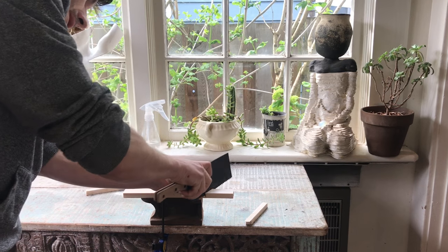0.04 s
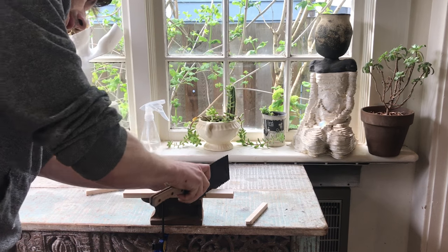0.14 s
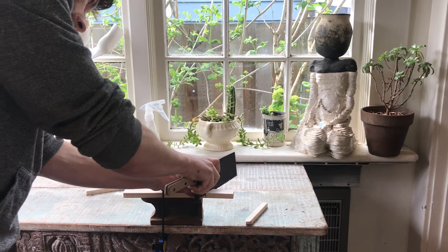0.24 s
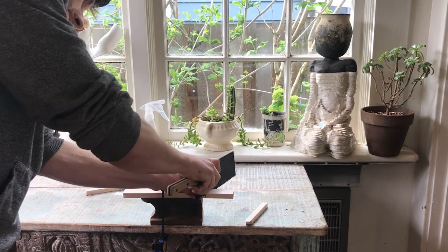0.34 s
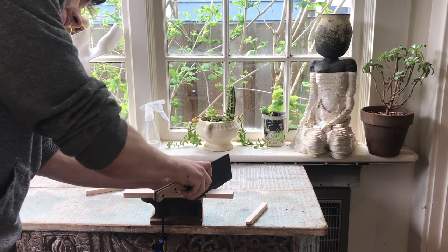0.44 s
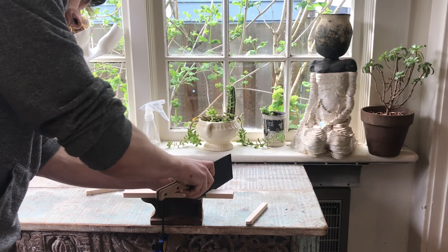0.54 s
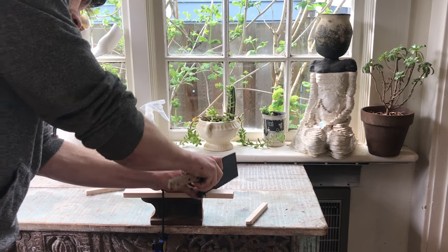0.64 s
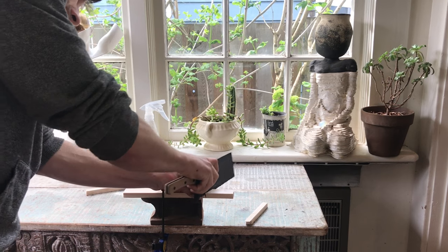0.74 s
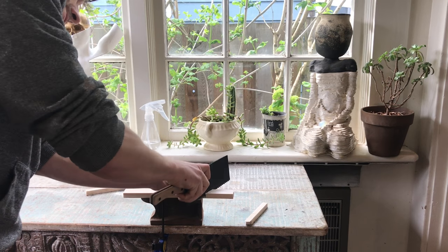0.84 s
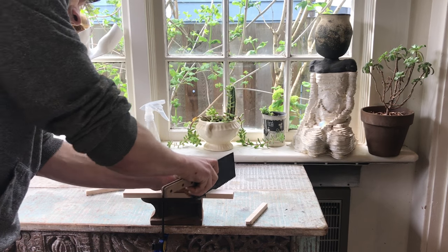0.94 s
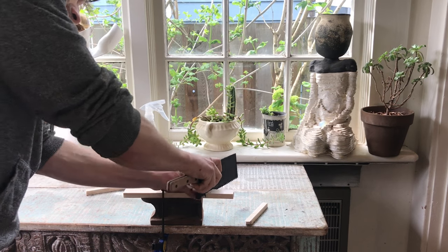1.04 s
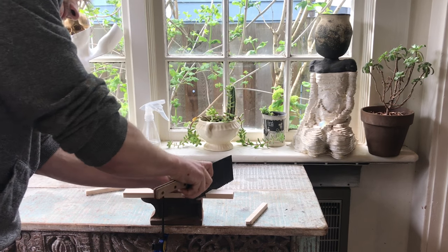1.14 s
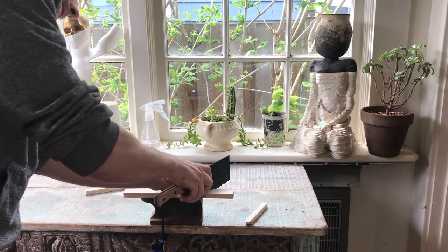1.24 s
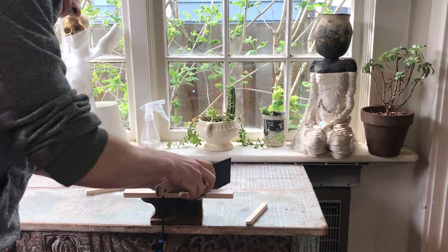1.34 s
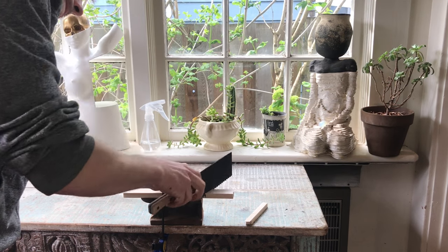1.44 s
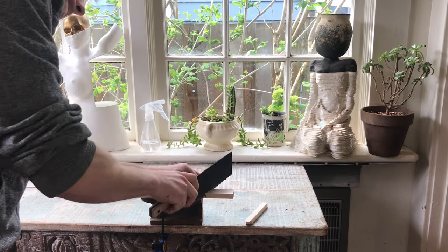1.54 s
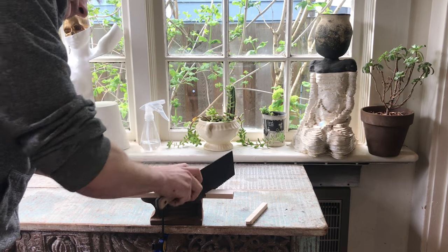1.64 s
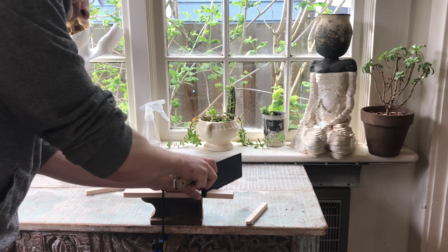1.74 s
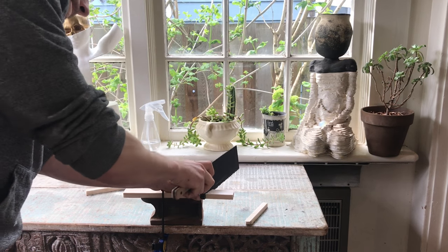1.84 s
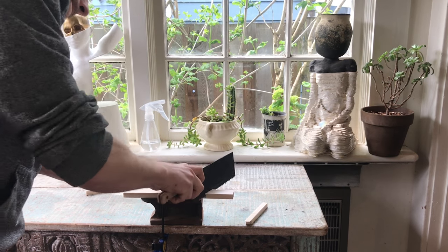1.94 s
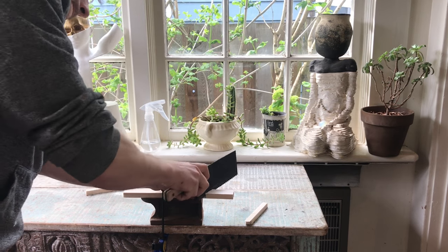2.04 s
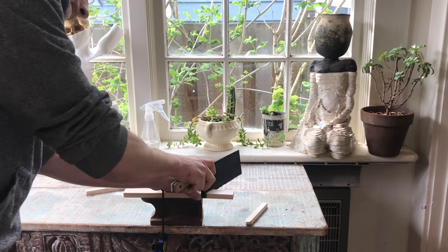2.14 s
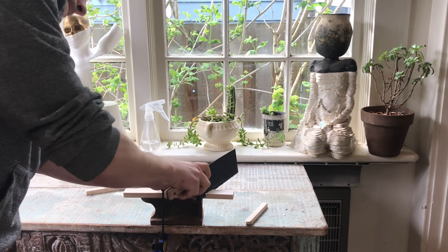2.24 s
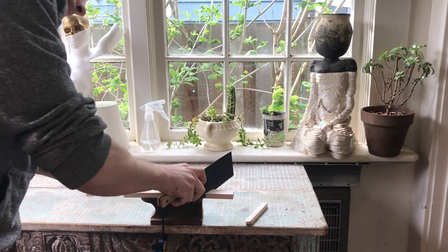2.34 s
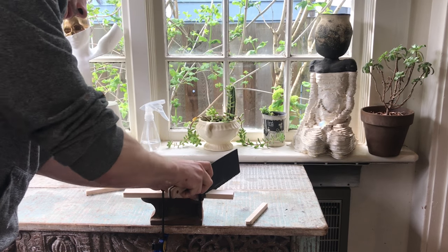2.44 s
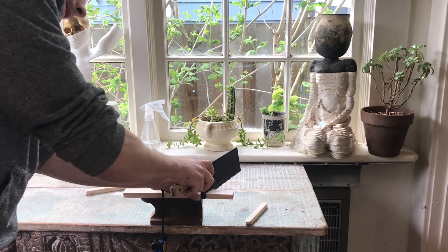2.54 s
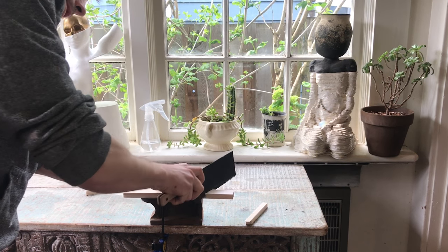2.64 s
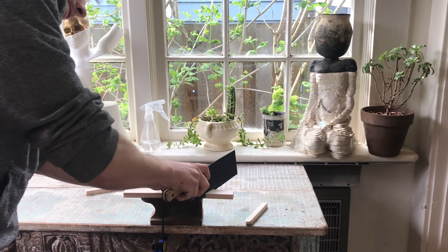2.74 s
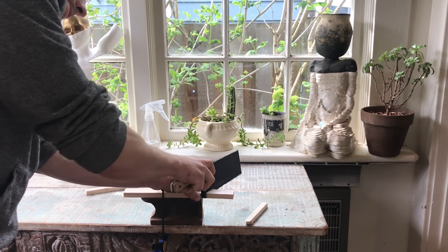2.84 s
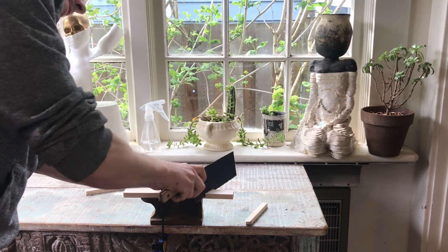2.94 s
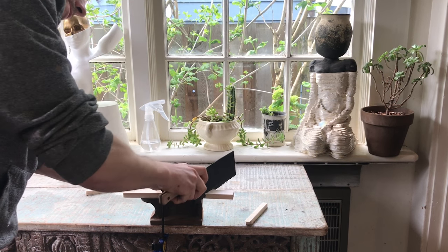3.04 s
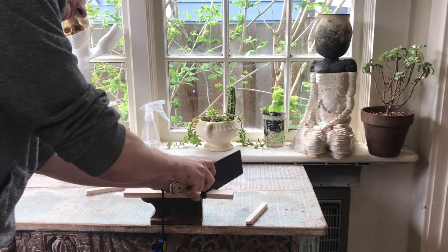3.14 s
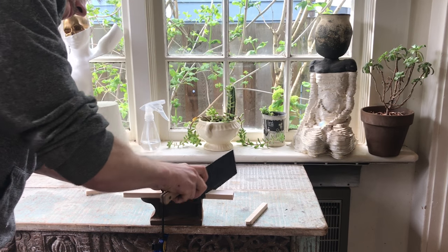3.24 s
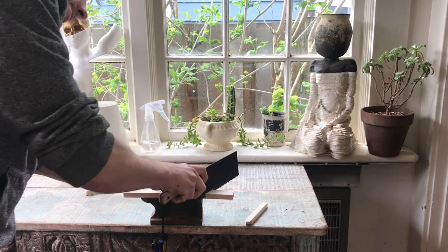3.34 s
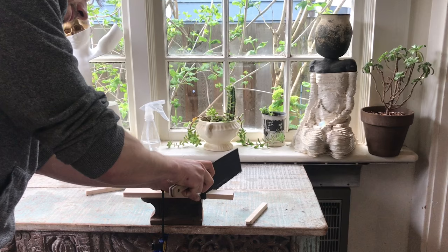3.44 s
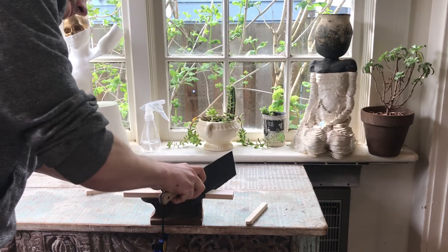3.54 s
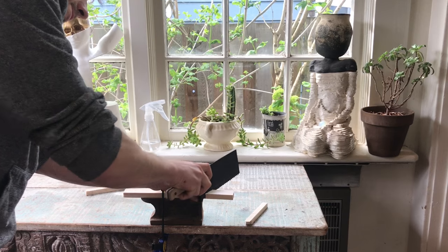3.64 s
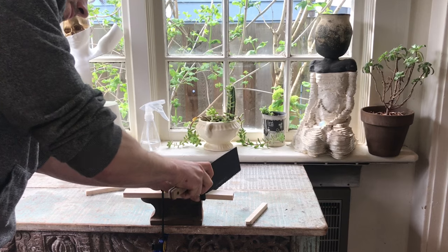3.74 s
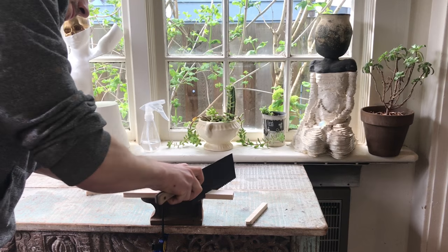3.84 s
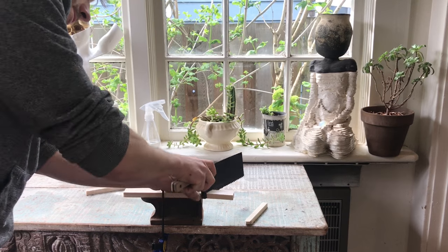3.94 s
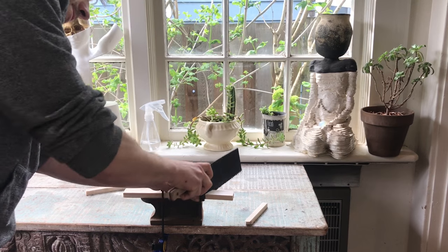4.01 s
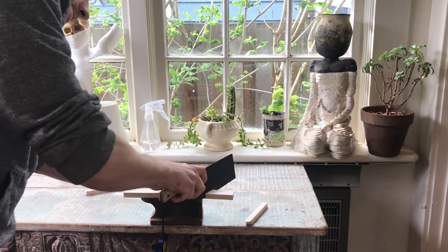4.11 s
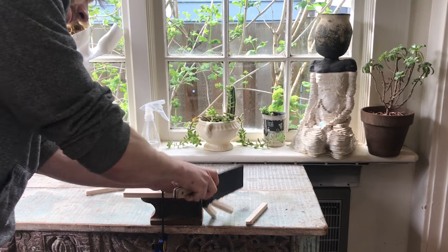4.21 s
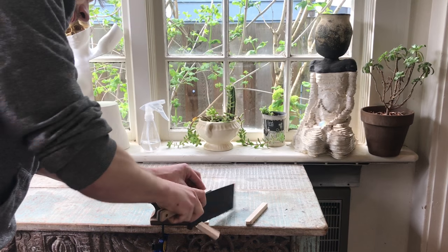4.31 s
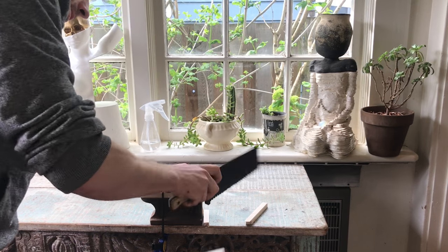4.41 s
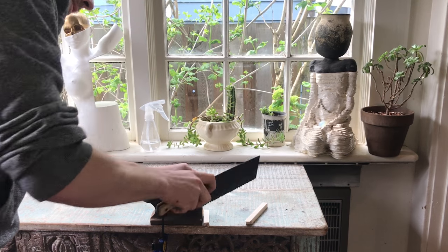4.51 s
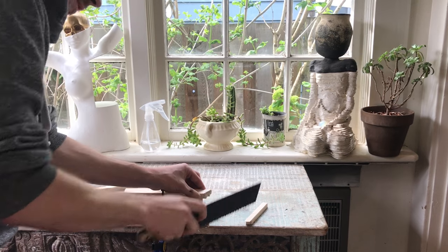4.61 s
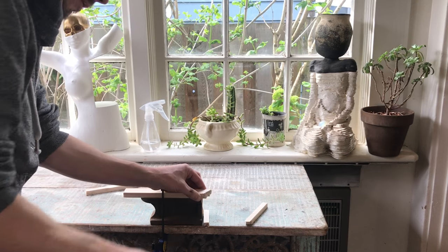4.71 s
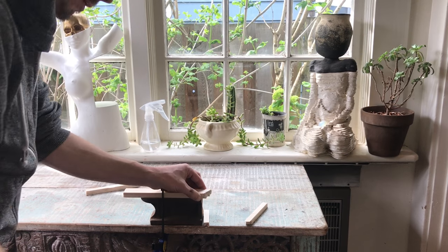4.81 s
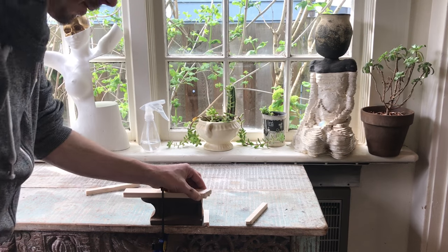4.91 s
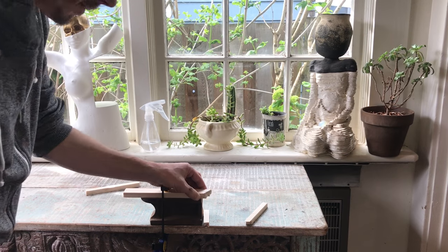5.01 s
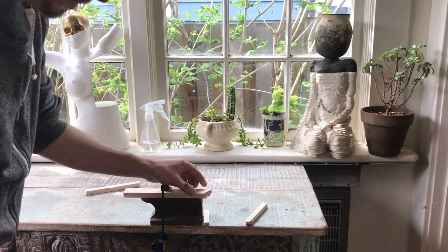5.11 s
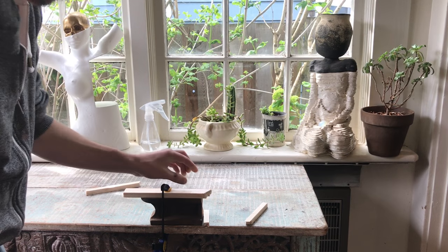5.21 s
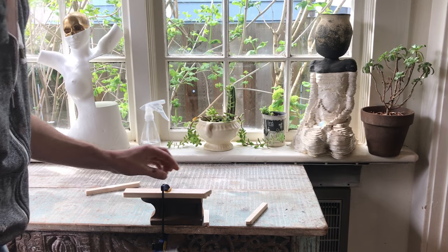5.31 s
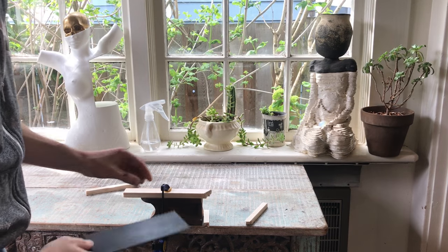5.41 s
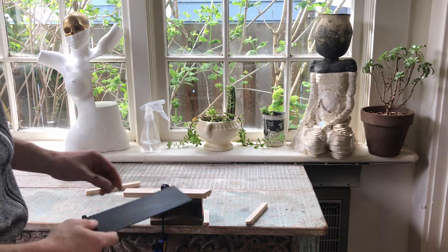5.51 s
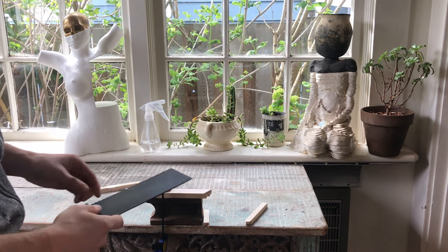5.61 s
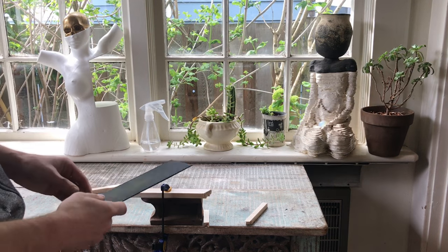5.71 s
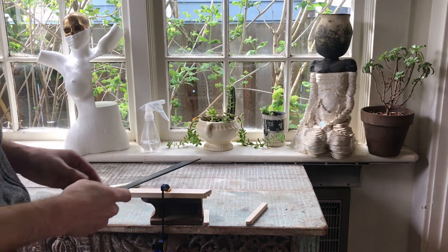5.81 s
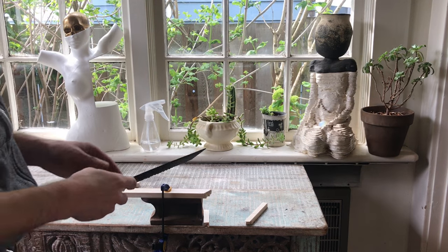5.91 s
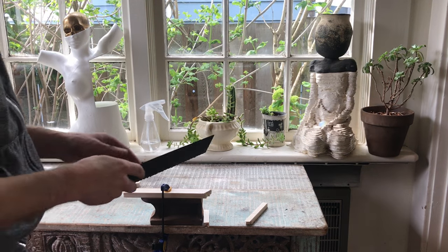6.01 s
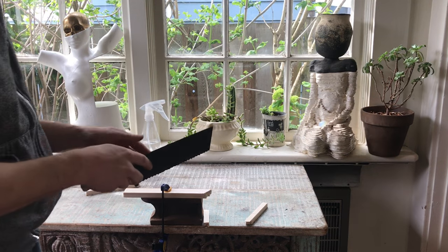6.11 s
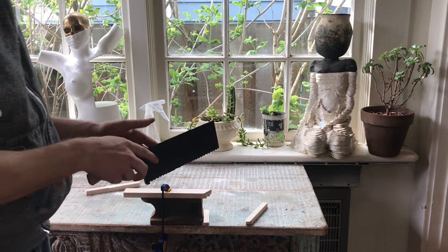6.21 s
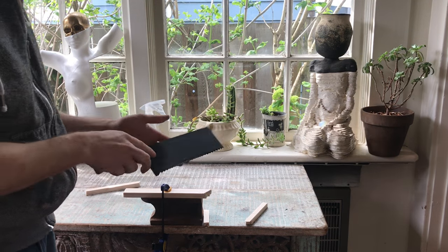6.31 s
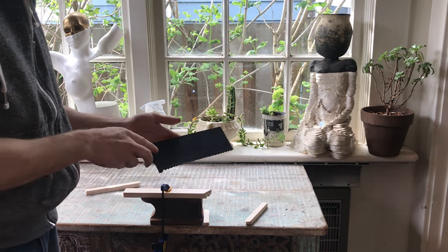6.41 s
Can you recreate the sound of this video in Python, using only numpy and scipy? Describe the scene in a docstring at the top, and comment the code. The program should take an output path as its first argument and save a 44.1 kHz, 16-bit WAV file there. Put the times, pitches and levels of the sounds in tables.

```python
"""Sawing through a strip of wood

A thin hand saw cuts a strip of wood held in a small vise on a table, in short quick strokes.
The teeth tear noisy fibres and push in regular pulses; resonances make the strip and table shake.
The blade squeaks and scrapes, then the strip snaps through and the offcut drops and clacks.
A few light clicks of handling follow, made of short noise bursts and dying tones.
Soft bumps and brushing, echoes of a small room, a low rumble and a faint hiss lie around them."""
import sys
import numpy as np
from scipy import signal
from scipy.io import wavfile
from scipy.ndimage import uniform_filter1d

SR = 44100
rng = np.random.default_rng(int(sys.argv[2]) if len(sys.argv) > 2 else 0)


def dump_mix(stems):
    """Bounce the given channels to the path in sys.argv[1] as a 16-bit WAV at rate SR."""
    frames = np.atleast_2d(stems).T  # one column per channel
    limited = np.clip(frames, -1, 1)  # hard clip at full scale
    pcm = np.round(limited * 32767).astype(np.int16)
    wavfile.write(sys.argv[1], SR, pcm)


N = 285018
TIME = np.arange(N) / SR

# Level columns in all tables are settings; the functions may trim them further.
# Strokes of the saw, out and back by turns: start_s, length_s, rasp_db (teeth), rasp_peak (0-1 of the
# stroke), ring_db (strip), drum_db (table top), thump_db (table frame), bind (0-1, where the blade binds)
STROKES = [(0.035, 0.15, -50.8, 0.36, -48.5, -49.3, -47.6, 0.58),
           (0.185, 0.237, -48.6, 0.72, -52.3, -43.5, -50.0, 0.27),
           (0.422, 0.148, -52.0, 0.15, -55.9, -45.2, -44.7, 0.28),
           (0.57, 0.202, -50.5, 0.59, -52.3, -42.3, -47.1, 0.7),
           (0.772, 0.168, -50, 0.25, -47.8, -48.3, -44.1, 0.41),
           (0.94, 0.19, -50.7, 0.36, -52.5, -46.9, -51.0, 0.33),
           (1.13, 0.18, -52.3, 0.15, -55.5, -53.3, -48.6, 0.5),
           (1.63, 0.062, -58.5, 0.55, -63, -58, -58, 0.6),
           (1.692, 0.172, -42.8, 0.56, -47, -35, -43.2, 0.62),
           (1.864, 0.178, -50, 0.38, -53.7, -45, -43.6, 0.48),
           (2.042, 0.213, -50.2, 0.57, -53.6, -39, -44.9, 0.7),
           (2.255, 0.144, -48.6, 0.28, -52.9, -47.7, -45.2, 0.39),
           (2.4, 0.213, -48.9, 0.32, -51.1, -49.5, -44.4, 0.59),
           (2.613, 0.146, -49.4, 0.18, -54.1, -45.9, -51.4, 0.58),
           (2.759, 0.181, -49.2, 0.35, -48.3, -37.5, -39.1, 0.65),
           (2.939, 0.132, -48.5, 0.13, -50, -42.7, -47.3, 0.55),
           (3.071, 0.175, -47.9, 0.5, -49.0, -39.6, -40.4, 0.7),
           (3.246, 0.122, -47.4, 0.23, -51.0, -46.6, -46.1, 0.77),
           (3.368, 0.168, -50.4, 0.49, -55.0, -42.5, -44.4, 0.67),
           (3.537, 0.113, -48.0, 0.26, -50.3, -44.1, -42.0, 0.69),
           (3.65, 0.153, -50.6, 0.44, -50.6, -43.0, -42.3, 0.38),
           (3.803, 0.109, -47.6, 0.18, -48.1, -33.2, -40.2, 0.66),
           (3.912, 0.142, -48.1, 0.49, -48.4, -35.2, -38.6, 0.18),
           (4.054, 0.114, -48.1, 0.24, -49.1, -38.1, -38.9, 0.42),
           (4.168, 0.171, -45.3, 0.52, -49.5, -30.8, -40.2, 0.51)]
# Colour of the tearing teeth: pitch_hz, level_db (per Hz)
RASP = [(530, -39), (900, -6.5), (1000, -6), (1410, -7), (1720, -3.5), (2120, -9), (2630, -4), (3860, -0.5),
        (5040, -4), (5890, -1), (7680, -4.5), (9650, -2), (10400, -6), (15100, 0.5), (16000, -8)]
# Resonances of the table's frame: pitch_hz, width_hz (of one pass of the filter), level_db
FRAME_MODES = [(53, 20, 2), (70, 20, 1), (85, 12, -1.5), (99, 13, 2)]
# Colour of the wooden offcut, also used for dull knocks: pitch_hz, level_db (per Hz)
OFFCUT = [(100, -33), (300, -4.5), (500, 0.5), (900, 0.5), (1500, -7.5), (2100, -15.5), (3500, -23.5),
          (6000, -32.5), (10000, -51), (16000, -32.5)]


def saw(rasp_db=0.3, wood_db=0.5, top_db=1.5, frame_db=1.7, slow_db=-10, wood_push=0.82, table_push=1.0):
    """Tearing fibres hiss off the blade, ring the strip and shake the table."""
    # colour of the strip in the vise: pitch_hz, level_db (per Hz)
    wood_colour = [(150, -24), (230, -25.5), (310, -5), (420, -3.5), (560, -14), (700, -4), (850, -20.5),
                   (1200, -7.5), (1800, -11), (3000, -5), (6000, -25), (12000, -31)]
    # resonances of the strip: pitch_hz, width_hz (one pass), level_db
    wood_modes = [(290, 25, 6.5), (360, 22, 11), (443.6, 44.5, 14), (486.8, 31, 15), (610, 80, 6.5),
                  (667, 50.5, 8.5), (719, 27, 9.5), (1012, 88, 0), (1189, 32, -1), (1680, 70, -2.5)]
    # resonances of the table top: pitch_hz, width_hz (one pass), level_db
    table_modes = [(163, 14, 0), (175, 20, -6), (210, 40, -20), (265, 70, -26)]
    # how each layer swells in a stroke: sharpness (of the hump), turn_db (left at the turns),
    # delay_s, lag_s, fade_db_per_s (once the blade stops)
    rasp_swell = (1.9, -16, 0, .011, 140)
    ring_swell = (3.0, -12.5, .012, .012, 90)
    drum_swell = (8, -16, .022, .016, 115)
    thump_swell = (3, -12, .025, .03, 55)

    _, _, rasps, peaks, rings, drums, thumps, bind = np.transpose(STROKES)
    place = stroke_at()
    rasp_gain = swell(place, rasps, peaks, rasp_swell)
    wood_gain = swell(place, rings, bind, ring_swell)
    # the heavy table takes longer to swell
    top_gain = swell(place, drums, bind, drum_swell)
    frame_gain = swell(place, thumps, bind, thump_swell)
    pushes, fibres, speed = teeth(along=place[1])

    # a fast blade sounds bright; a duller scrape lies below it and shows when the blade is slow
    bright = evened(through(fibres, colour(RASP)))
    dull = evened(through(fibres, colour(RASP, tilt_db=-2.5)))
    hiss = speed ** 0.905 * bright + amp(slow_db) * dull
    hiss = steadied(hiss + 0.5 * room(hiss), size=500)

    # the tooth rate sweeps through the resonances of the strip
    strip = through(fibres, colour(wood_colour)) + resonate(fibres + wood_push * pushes, wood_modes)
    strip = steadied(strip, size=1000)

    # the vise hands the force on to the table top and its frame
    force = fibres + table_push * pushes
    drum = steadied(resonate(force, table_modes), size=1200)
    thump = steadied(resonate(force, FRAME_MODES), size=1600)

    blade_and_strip = amp(rasp_db) * rasp_gain * hiss + amp(wood_db) * wood_gain * strip
    table = amp(top_db) * top_gain * drum + amp(frame_db) * frame_gain * thump
    return blade_and_strip + table


def teeth(along, bite=0.61, between=0.67, grain_db=2.0):
    """The blade speeds up and slows in each stroke; every tooth gives a push and tears a burst of fibres."""
    tooth_hz, jitter = 489.2, 0.08  # teeth a second in mid-stroke, and their unevenness
    speed = abs(np.sin(np.pi * along))
    wobble = evened(uniform_filter1d(rng.standard_normal(N), size=300))
    rate_hz = tooth_hz * (0.08 + 0.92 * speed) * np.exp(jitter * wobble)
    passed = np.cumsum(rate_hz) / SR  # teeth gone by so far

    # one pulse, of random strength, each time a whole tooth has passed
    pushes = np.diff(np.floor(passed), prepend=0) * rng.uniform(0.68, 1, N)
    pushes = signal.sosfilt(signal.butter(2, 35, "high", fs=SR, output="sos"), pushes)

    # grainy noise, strongest just after each tooth bites
    fibres = rng.standard_normal(N) * amp(grain_db * rng.exponential(1, N))
    fibres *= between + np.exp(-(passed % 1) / bite)
    return evened(pushes), evened(fibres), speed


def stroke_at():
    """For every sample: the stroke under way, how far along it is (0-1), and the seconds since it ended."""
    start, length = np.transpose(STROKES)[:2]
    index = np.maximum(np.searchsorted(start, TIME, side="right") - 1, 0)
    since = TIME - start[index]
    return index, np.clip(since / length[index], 0, 1), np.maximum(since - length[index], 0)


def swell(place, db, peak, shape):
    """Gain of one layer: a hump in each stroke, highest at peak, lagging the blade and fading at rest."""
    index, along, rest = place
    sharpness, turn_db, delay, lag, fade_db = shape
    peak = np.clip(peak, 0.05, 0.95)[index]
    climb = np.minimum(along / peak, (1 - along) / (1 - peak))
    hump = np.sin(np.pi / 2 * climb) ** sharpness
    gain = amp(db[index] - fade_db * rest) * (hump + (1 - hump) * amp(turn_db))
    # smooth the gain, then delay it
    keep = np.exp(-1 / (lag * SR))
    smooth = signal.lfilter([1 - keep], [1, -keep], gain, zi=[keep * gain[0]])[0]
    return np.interp(TIME - delay, TIME, smooth)


def squeaks(width_hz=80, sag=0.033):
    """The blade squeaks in the cut and the strip moans briefly: noise in a narrow resonance, its pitch sagging."""
    # squeaks and moans: start_s, length_s, pitch_hz (mid-squeak), level_db
    songs = [(.1, .055, 470, -47), (.995, .06, 745, -55), (1.04, 0.071, 1540, -56.5),
             (2.06, .035, 1680, -63), (2.8, .06, 735, -54), (2.995, .07, 490, -51.5)]
    out = np.zeros(N)
    for s, length, hz, db in songs:
        count = int(length * SR)
        tone = resonance(rng.standard_normal(SR // 2), hz, width_hz)
        # read the tone at a slowing pace, skipping its first 0.1 s
        pace = 1 + sag * np.linspace(0.5, -0.5, count)
        sung = np.interp(SR / 10 + np.cumsum(pace), np.arange(len(tone)), tone)
        add(out, s, amp(db) * steadied(sung, size=600) * signal.windows.tukey(count, 0.7))
    return out


def scrapes():
    """The side of the blade binds in the cut: short, very grainy friction noise."""
    # scrapes: start_s, length_s, centre_hz, level_db
    rows = [(0, .035, 9000, -63), (.39, .08, 1500, -60.5), (.69, 0.074, 1550, -56),
            (.77, 0.022, 5870, -56.5), (1.76, .08, 4000, -55), (2.87, 0.092, 1500, -60),
            (3.2, 0.089, 1660, -60), (3.85, 0.056, 2200, -57.5)]
    return rubs(rows, spread=0.86, grain_db=5)


def snaps(grain_db=2, fade=0.38):
    """Fibres catch and snap: each snap is a quick run of breaking fibres, made of grainy noise."""
    # snaps: start_s, length_s, level_db, low_db (extra in the low mids)
    rows = [(.33, 0.028, -33.5, 11), (.712, .01, -48, 6), (0.778, 0.0073, -44.5, 15), (.875, .008, -47, 4),
            (4.254, 0.011, -24.2, -2.5), (4.28, 0.019, -47.5, 1.5)]
    # colour of a snap: pitch_hz, level_db (per Hz)
    snap_colour = [(200, -22), (600, -6), (1300, 3.5), (2400, 4), (4000, 1), (5500, -4.5), (8000, -4),
                   (11000, 0.5), (15500, 1)]
    out = np.zeros(N)
    for s, length, db, low_db in rows:
        u = np.linspace(0, 1, int(length * SR))
        noise = rng.standard_normal(len(u))
        grains = amp(grain_db * np.minimum(rng.exponential(1, len(u)), 3))
        breaks = noise * grains * np.exp(-fade * u)
        spectrum = [(hz, level + low_db / (1 + (hz / 2300) ** 4)) for hz, level in snap_colour]
        add(out, s, amp(db) * blow(signal.fftconvolve(breaks, colour(spectrum))))
    return out


def offcut(clack_db=1, ring_db=-4):
    """The loose end lands and bounces: each contact clacks on the table top, which rings."""
    # landings: start_s, level_db
    landings = [(4.3262, -26), (4.332, -27), (4.346, -32.5), (4.36, -34.5), (4.373, -36.5)]
    # ringing of the table top: pitch_hz, level_db, t60_s (time to die by 60 dB)
    top_modes = [(307, -4, .27), (414, -6, .27), (452, -5, .3), (492, -1, .25), (565, -5, .28),
                 (615, 0, .32), (719, -5, .28), (858, -2, .2), (935, -7, .2), (1110, -8, .2),
                 (1197, -6, .27), (1398, -9, .2), (1477, -9, .25)]
    out = np.zeros(N)
    for s, db in landings:
        add(out, s, amp(db + clack_db) * clatter(OFFCUT, decay=0.016, body_db=7))
        add(out, s, amp(db + ring_db) * ring(top_modes))
    return out


def handling(room_db=-2, knock_tilt_db=5):
    """Wood, vise and saw in the hands: a click, a wooden knock and a thin steel ring, with room echoes."""
    # contacts: start_s, click_db, knock_db, steel_db, bright_db (click tilt per octave above 1 kHz)
    contacts = [(4.464, -62, -78, -90.5, 7), (4.514, -63, -81, -97, 4), (4.8197, -51, -51, -82, 15),
                (4.825, -43.5, -46, -52, 7.5), (4.83, -63, -53, -69, 3.5), (5.102, -70, -75, -85, -7),
                (5.131, -72, -66, -89, 0), (5.266, -72.5, -73.5, -85, -1), (5.556, -61, -74, -87, 1),
                (5.571, -63.5, -74, -87, -1), (5.573, -53.5, -74.5, -88, -.5),
                (6.328, -64.5, -81, -91, -3.5), (6.399, -53, -64, -80, -0.5), (6.402, -67, -77, -83, -2.5)]
    # colour of a click: pitch_hz, level_db (per Hz)
    click_colour = [(300, -21.5), (1000, -7.5), (2000, -1), (3300, -1.5), (5000, -3.5), (7000, -3),
                    (10500, -7), (15500, -6)]
    # ringing of the steel: pitch_hz, level_db, t60_s (time to die by 60 dB)
    steel_modes = [(7300, 0, .28), (7390, -5, .2), (9039, -9, .25), (10230, -5, .05), (13050, 3, .2),
                   (13300, 1, .17), (14400, -1, .17), (14600, 2, .2)]
    near, sent = np.zeros((2, N))
    for s, click_db, knock_db, steel_db, bright_db in contacts:
        click = clatter(click_colour, decay=0.0041, body_db=4, tilt_db=bright_db)
        add(near, s, amp(click_db) * click)
        knock = clatter(OFFCUT, decay=0.01, body_db=-1.5, tilt_db=knock_tilt_db)
        add(near, s, amp(knock_db) * knock)
        add(near, s, amp(steel_db) * ring(steel_modes))
        # the room gets only the bare contacts
        add(sent, s, amp(click_db) * blow(colour(click_colour, bright_db)))
        add(sent, s, 0.83 * amp(knock_db) * blow(colour(OFFCUT, knock_tilt_db)))
    return near + amp(room_db) * room(sent)


def clatter(spectrum, decay, body_db, tilt_db=0):
    """A sharp contact, then dense vibration: one pulse plus quickly dying noise (decay in seconds)."""
    t = np.arange(SR // 5) / SR
    contact = blow(rng.standard_normal(len(t)) * np.exp(-t / decay)) * amp(body_db)
    contact[0] += blow(np.ones(1))[0]
    return blow(signal.fftconvolve(contact, colour(spectrum, tilt_db)))


def ring(modes):
    """A struck body rings: half a second of dying sines that start at random phases."""
    t = np.arange(SR // 2) / SR
    total = np.zeros(len(t))
    for hz, db, t60 in modes:
        total += amp(db - 60 * t / t60) * np.sin(2 * np.pi * (hz * t + rng.random()))
    return blow(total)


def rustles():
    """Sleeves and fingers brush softly: quiet friction noise with a mild grain."""
    # brushes: start_s, length_s, centre_hz, level_db
    rows = [(1.36, .28, 1100, -79), (4.99, .08, 2050, -77), (5.09, 0.11, 2600, -79),
            (5.53, 0.042, 5000, -74.5), (5.83, 0.091, 1180, -76), (6.13, 0.077, 2390, -81)]
    return rubs(rows, spread=0.79, grain_db=2.5)


def rubs(rows, spread, grain_db):
    """Brief grainy friction that swells and fades around one broad resonance."""
    out = np.zeros(N)
    for s, length, hz, db in rows:
        count = int(length * SR)
        noise = rng.standard_normal(count)
        grains = noise * amp(grain_db * np.minimum(rng.exponential(1, count), 4))
        rub = resonance(grains, hz, spread * hz) * np.hanning(count)
        add(out, s, amp(db) * evened(rub))
    return out


def bumps(length=0.038):
    """The saw jolts the table and the hands move about: gentle shoves of noise stir the table's frame."""
    # bumps: start_s, level_db
    shoves = [(0, -44), (.885, -36), (1.46, -58), (2.6, -41), (4.543, -60), (4.825, -58), (5.28, -60),
              (5.869, -58), (5.943, -53), (6.009, -61.5)]
    out, count = np.zeros(N), int(length * SR)
    for s, db in shoves:
        # silence after the shove leaves time to ring
        shove = np.pad(rng.standard_normal(count) * np.hanning(count), (0, SR // 4))
        add(out, s, amp(db) * blow(resonate(shove, FRAME_MODES)))
    return out


def air(level_db=-68):
    """Low rumble of the room, plus a faint hiss of changing level; both are coloured noise."""
    # colour of the still room: pitch_hz, level_db (per Hz)
    air_colour = [(15, -52.5), (25, -22), (92, -2), (153, -19), (242, -14.5), (270, -13), (326, -21),
                  (545, -24.5), (624, -25), (2220, -34), (2410, -34), (3820, -42), (16000, -42.5)]
    # points along the level of the faint hiss: time_s, level_db
    hiss_levels = [(1.55, -77), (4.3, -72), (4.66, -68.5), (4.675, -84), (4.9, -74.5), (5.1, -74),
                   (5.2, -82.5), (6.28, -79), (6.34, -70.5), (6.46, -72)]
    still = amp(level_db) * evened(through(rng.standard_normal(N), colour(air_colour)))
    hiss = evened(through(rng.standard_normal(N), colour(RASP, tilt_db=-4.5)))
    return still + amp(np.interp(TIME, *np.transpose(hiss_levels))) * hiss


def room(x, gap=0.0011):
    """Dense reflections of a small room: noise whose bands each die at their own speed, after gap seconds."""
    # how long the echoes last: pitch_hz, t60_s (time to die by 60 dB)
    echo_times = [(100, 0.38), (500, .42), (2000, 0.37), (6000, 0.41), (15000, 0.21)]
    hz, t, bands = signal.stft(rng.standard_normal(SR * 3 // 4), SR, nperseg=256)
    dying = amp(-60 * t / read(echo_times, hz)[:, None])
    tail = signal.istft(bands * dying, SR, nperseg=256)[1]
    tail[:int(gap * SR)] = 0
    return through(x, tail / np.linalg.norm(tail))


def resonance(x, hz, width):
    """One resonance with a gain of about 1 at its peak, applied twice so that its flanks are steep."""
    pole = np.exp((2j * np.pi * hz - np.pi * width) / SR)
    return 2 * signal.lfilter([(1 - abs(pole)) ** 2], np.poly([pole, pole]), x).real


def resonate(x, modes):
    """A body with several resonances, each with its own peak gain."""
    return sum(amp(db) * resonance(x, hz, width) for hz, width, db in modes)


def colour(points, tilt_db=0, size=4096):
    """Response with the given spectrum, tilted per octave above 1 kHz, its energy as early as possible."""
    hz = abs(np.fft.fftfreq(size, 1 / SR))
    tilt = tilt_db * np.log2(np.maximum(hz, 1000) / 1000)
    log_gain = np.log(amp(read(points, hz) + tilt))
    # the Hilbert transform of the log gain gives the matching phase
    return np.fft.ifft(np.exp(np.conj(signal.hilbert(log_gain)))).real


def through(x, response):
    """Passes x through an impulse response."""
    return signal.oaconvolve(x, response)[:N]


def read(points, hz):
    """Reads a table between its points on a log-frequency axis."""
    f, value = np.transpose(points)
    return np.interp(np.log(hz + 1), np.log(f + 1), value)


def amp(db):
    """Decibels to gain."""
    return 10 ** (np.asarray(db) / 20)


def evened(x):
    """Scales to an average strength (rms) of 1."""
    return x / np.sqrt(np.mean(x ** 2) + 1e-20)


def steadied(x, size):
    """Holds the rms near 1 all along, by dividing by the strength around each sample."""
    power = uniform_filter1d(uniform_filter1d(x ** 2, size), size)
    return x / np.sqrt(abs(power) + 1e-4 * np.mean(x ** 2))


def blow(x):
    """Scales a short sound to the energy of 10 ms at rms 1."""
    return x * np.sqrt(SR / 100 / (np.sum(x ** 2) + 1e-20))


def add(mix, s, sound):
    """Mixes a sound in at time s (seconds)."""
    part = mix[max(round(s * SR), 0):][:len(sound)]
    part += sound[:len(part)]


def scene():
    """The saw and the small blows, with the room around them."""
    cutting = saw() + squeaks() + scrapes()
    cracks, knocks = snaps(), offcut()
    direct = cutting + amp(-3) * cracks + amp(-2.5) * knocks
    echo = room(amp(-18.5) * cutting + amp(-4.5) * cracks + amp(-8) * knocks)
    hands = amp(-1) * handling() + rustles() + bumps()
    return (direct + echo + hands + air())[None]


def record(dry):
    """A steep low-pass filter removes the highest treble."""
    edge_hz = 15900
    low_pass = signal.firwin(511, edge_hz, window=("kaiser", 9), fs=SR)
    return signal.oaconvolve(dry, low_pass[None], "same")


dry = scene()
out = record(dry)
dump_mix(out)
```